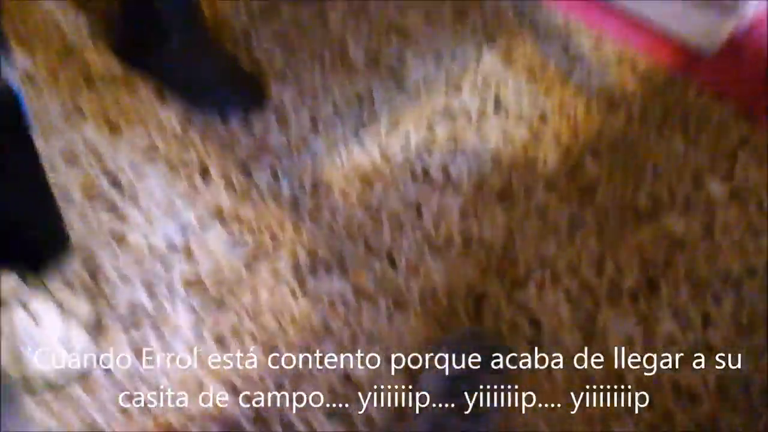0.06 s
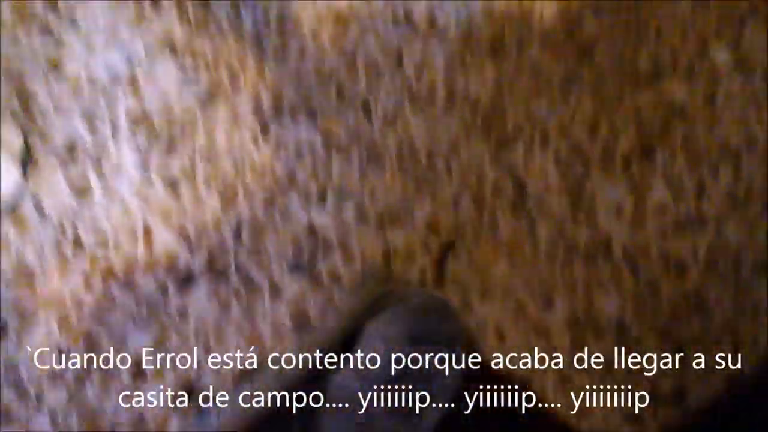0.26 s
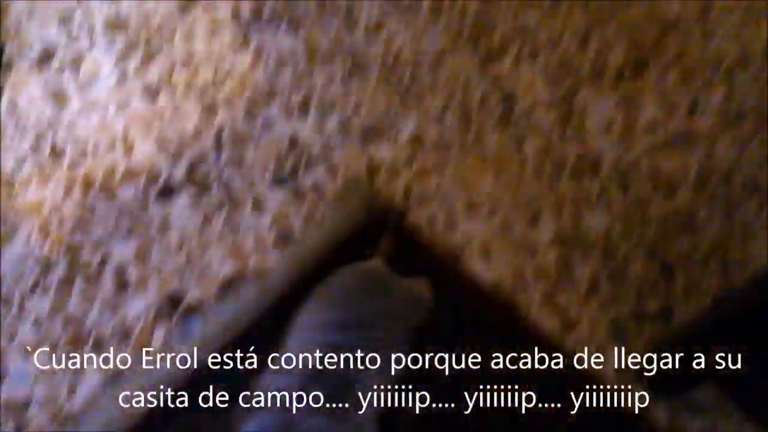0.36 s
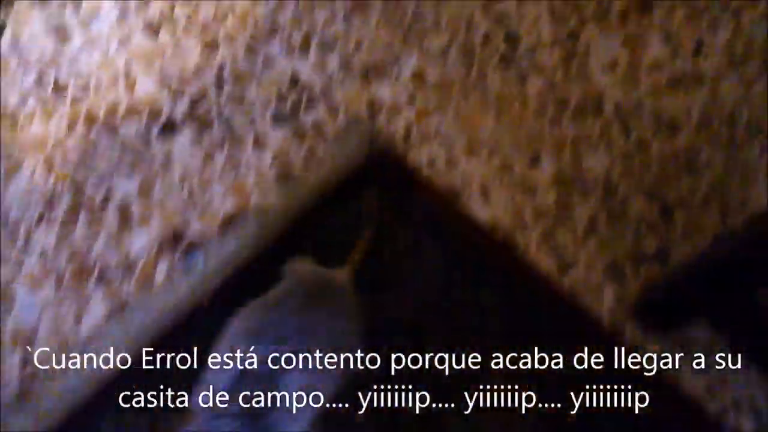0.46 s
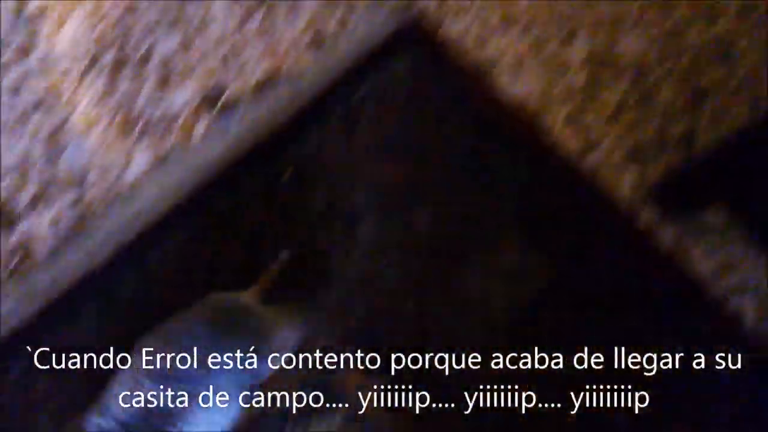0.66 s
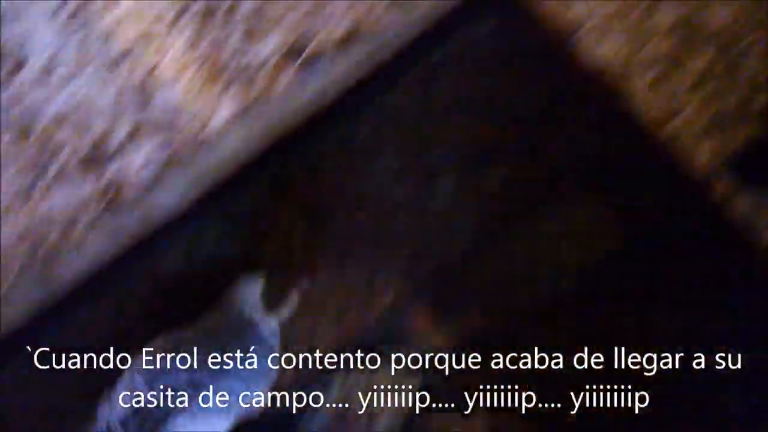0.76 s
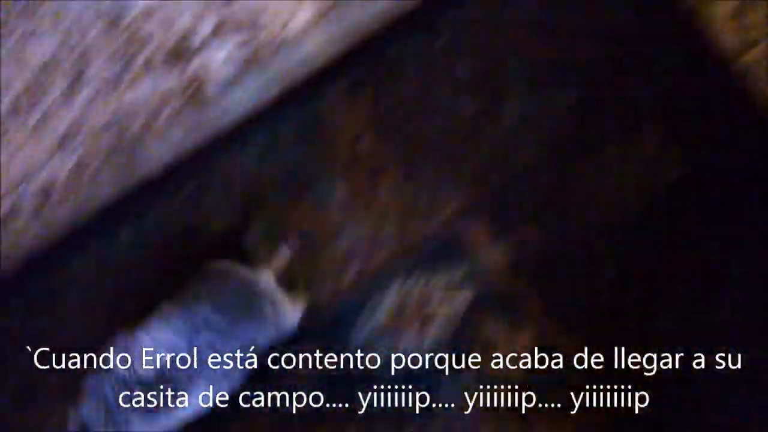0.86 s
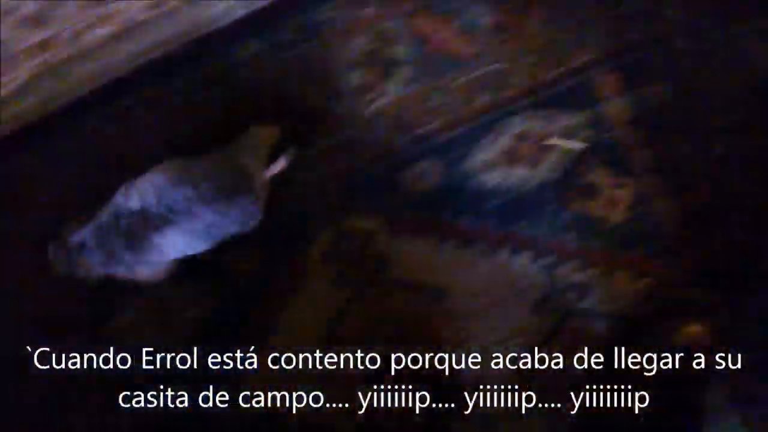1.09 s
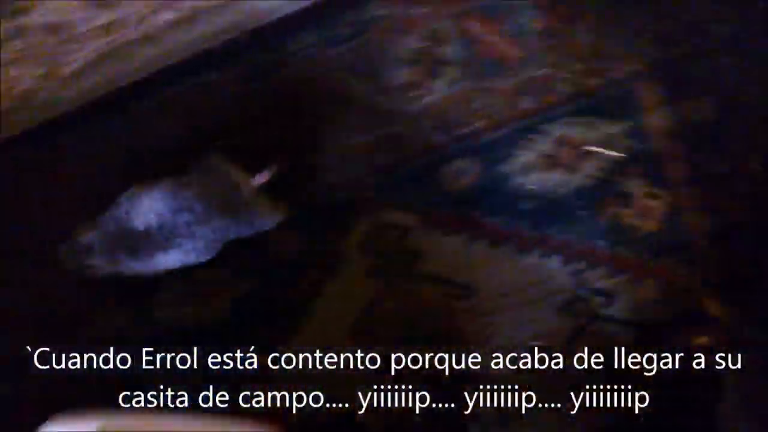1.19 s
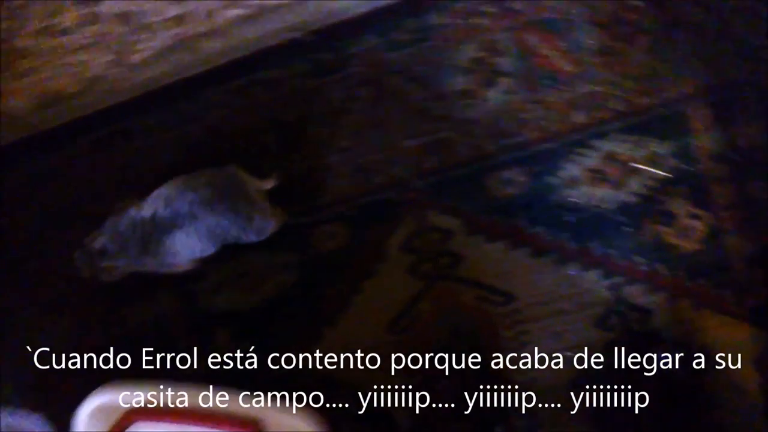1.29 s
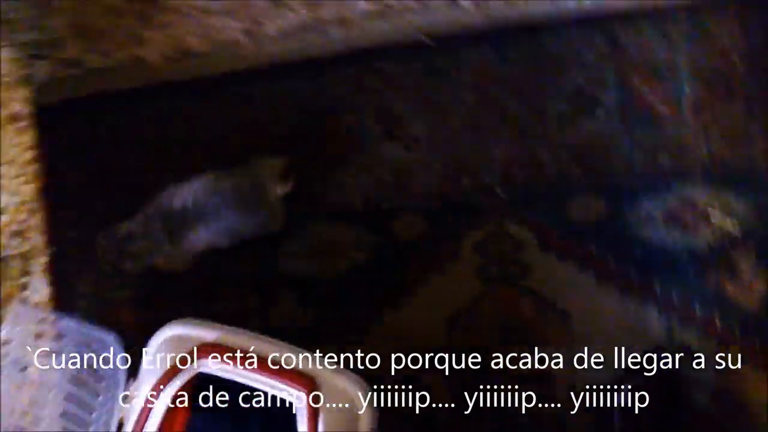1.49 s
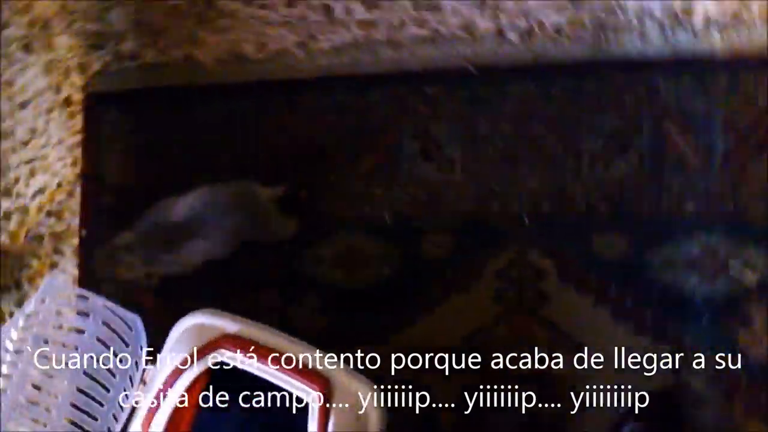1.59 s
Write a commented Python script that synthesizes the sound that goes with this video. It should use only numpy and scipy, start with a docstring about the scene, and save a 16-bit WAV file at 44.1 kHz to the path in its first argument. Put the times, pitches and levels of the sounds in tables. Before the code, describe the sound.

A prairie dog gives one harsh, piercing yip in a small carpeted room, from 0.2 to 0.92 seconds, its pitch dipping, wavering and rising again, mixed with hiss and ending in a raspy puff. A soft footfall hides beneath it at 0.33. Quiet hum and handheld rumble continue; cloth rustles at the start and around 1.3, a step lands at 1.53, a tiny tick at 1.6.

```python
"""Faint hum, room noise, the rumble of a hand-held microphone and rustling cloth (shaped noise) come first.
At 0.2 s a prairie dog gives one long, harsh, wavering yip on the carpet of a small room: a stack of
overtones mixed with hiss. A soft footfall, made of dying sine waves, lies under it at 0.33 s.
The yip ends near 0.92 s in a short raspy puff of noise, and the room rings briefly.
Then a faint low ring swells, cloth rustles again, a foot lands at 1.53 s and something ticks at 1.61 s."""
import sys
import numpy as np
from scipy import signal
from scipy.fft import rfft, irfft
from scipy.io import wavfile
from scipy.ndimage import map_coordinates

SR = 44100
rng = np.random.default_rng(int(sys.argv[2]) if len(sys.argv) > 2 else 0)


def to_wav(s):
    """Save 16-bit WAV."""
    ch = np.atleast_2d(s).T  # columns
    pcm = np.round(np.clip(ch, -1, 1) * 32767)  # PCM
    wavfile.write(sys.argv[1], SR, pcm.astype(np.int16))


N = 72765
T, HZ = np.arange(N) / SR, np.fft.rfftfreq(N, 1 / SR)
EDGE_HZ = 15600  # top of the sound

# Colour of the room noise: (frequency [Hz], relative level [dB])
AIR_COLOUR = [(15, 7), (30, 4.5), (55, -5), (95, -12.5), (150, -21.5), (300, -22), (600, -23), (1000, -28),
              (2500, -37), (5000, -38.5), (7500, -33.5), (11000, -40), (15500, -53)]
# How alike the room noise is at both ears, before balancing: (frequency [Hz], likeness [0-1])
AIR_LIKENESS = [(30, 0.076), (120, 0.28), (300, 0.73), (1000, 0.19), (4000, 0.033)]
# Balance of the room noise: (frequency [Hz], left over right [dB])
AIR_BALANCE = [(30, -1), (70, 15.5), (200, -5), (600, -5), (8000, 1.5)]
AIR_DB, RUMBLE_HZ = -55, 114  # room noise level before the rumble changes; the rumble lies below this pitch
# Change in the handling rumble: (time [s], level [dB])
RUMBLE_LEVEL = [(0, -3.5), (.17, 1.5), (.35, 0.5), (1.0, 1), (1.2, -3), (1.3, -9.5), (1.65, -8)]
# Steady hums: (frequency [Hz], width [Hz], level [dB])
HUMS = [(303.3, 3.7, -76.5), (528, 30, -81.5)]
# Faint low ring, strongest after the call: (time [s], level [dB])
RING_LEVEL = [(.15, -107), (.24, -65), (.4, -80), (.98, -75.5), (1.1, -62), (1.27, -73), (1.36, -79)]
RING_HZ, RING_WIDTH_HZ = 552, 40

# Strokes of cloth: (start [s], attack [s], hold [s], time to fall 60 dB [s], level [dB])
RUSTLES = [(0, 0.005, 0.0073, 0.17, -68), (0.063, 0.078, 0.019, 0.092, -79),
           (1.08, 0.067, 0.015, 0.21, -76), (1.279, 0.087, 0.082, 0.1, -65.5), (1.628, 0.025, .02, .1, -69)]
# Colour of the cloth noise: (frequency [Hz], relative level [dB])
CLOTH_COLOUR = [(200, -13), (600, -12), (1700, -1), (2800, 1), (4500, -4.5), (8000, -11.5), (11000, -17),
                (15500, -31)]

# Pitch of the voice before its random wavering: (time [s], pitch [Hz])
PITCH = [(.196, 2417), (.211, 2500), (.238, 2410), (.252, 2300), (.266, 2380), (.28, 2290), (.29, 2470),
         (.301, 2830), (.32, 2750), (.34, 2447), (.358, 1900), (.392, 1443), (.44, 1990), (.458, 1985),
         (.472, 2045), (.495, 1946), (.51, 2060), (.528, 1835), (.552, 1820), (.568, 1985), (.58, 1814),
         (.592, 1805), (.606, 1577), (.634, 1975), (.65, 1950), (.672, 1540), (.697, 1989), (.718, 2100),
         (.742, 2020), (.758, 2470), (.784, 2650), (.822, 2440), (.868, 2385), (.9, 2200), (.93, 2170)]
# Effort of the call: (time [s], level [dB])
EFFORT = [(.194, -53), (.198, -39.5), (.214, -37), (.24, -33), (.272, -38), (.3, -32), (.325, -37),
          (.345, -44), (.38, -44), (.44, -38.5), (.49, -38), (.55, -32.5), (.59, -38.5), (.612, -39.5),
          (.635, -41.5), (.668, -44), (.705, -40.5), (.738, -37), (.765, -36), (.85, -35.5), (.866, -40),
          (.915, -34), (.93, -59), (.94, -77)]
# State of the throat: (time [s], roughness [0-1], strength of the half-pitch lines [0-1])
THROAT_STATE = [(.2, 0.2, 0), (.236, 0.22, 0), (.256, 1.03, 0.18), (.3, 0.71, 0.04), (.35, 0.92, 0.26),
                (.41, .5, 0.05), (.45, 0.2, 0.4), (.485, 0.07, 0.42), (.508, 1, 0.23), (.532, 0.1, .03),
                (.562, 0.33, 0.03), (.6, 0.65, 0), (.635, 0.4, 0), (.665, 0.47, 0), (.7, 0.48, 0.28),
                (.74, 0.77, 0.76), (.775, 0.04, 0.14), (.798, 0.25, 0.36), (.815, .55, 0.48),
                (.85, .2, 0.36), (.88, 0.63, 0.13), (.92, 0.7, 0.3)]
# Shape of the mouth: (time [s], extra level of the fundamental [dB], treble slope above PIVOT_HZ [dB/octave])
MOUTH_SHAPE = [(.2, -6, 6.5), (.3, -0.5, 11.5), (.4, 0.5, 7.5), (.47, 0.5, 5.5), (.54, 0.5, -9),
               (.66, 0.5, 6), (.735, -5, -12.5), (.78, 1, -10.5), (.85, 2, -14.5), (.92, 8, -4.5)]
# Throat and mouth response for the tone: (frequency [Hz], level [dB])
TONE_RESPONSE = [(700, -45), (1300, -24.5), (1900, -12.5), (2500, -6), (3000, -18), (3700, -4), (5000, -9),
                 (6200, -5), (7400, 0.5), (8600, 0), (9900, -4.5), (11500, -9.5), (15500, -23.5)]
# Throat and mouth response for the hiss: (frequency [Hz], relative level [dB])
HISS_RESPONSE = [(300, -36), (1300, -42), (2200, -13), (2900, -19.5), (3700, -12.5), (4700, -4.5),
                 (6000, -7), (7600, 0.5), (9900, 0.5), (12000, -7.5), (15500, -21)]
PIVOT_HZ = 7160  # main resonance
WAVER, WAVER_HZ = 0.00367, 94  # constant wobble: share of the pitch, bandwidth
JITTER, JITTER_HZ = 0.0313, 448  # wobble at full roughness: share of the pitch, bandwidth
SHIMMER, FLUTTER_HZ = 0.52, 297.1  # flutter of each overtone at full roughness: depth, new values per second
HISS_SHARE, HISS_GROWTH = 0.82, 1.18  # share at full roughness; hiss grows faster than roughness

# Soft footfalls: (time [s], level [dB])
STEPS = [(.33, -61.5), (1.53, -55)]
# What the floor rings with: (frequency [Hz], relative level [dB], time to fall 60 dB [s])
FLOOR_MODES = [(200, -9.5, 0.1), (296, -2.5, 0.029), (649, -9, 0.12), (848, -12, 0.12), (935, -5, 0.059),
               (1231, -11, 0.091), (2060, -25, .1)]

# Rasp that leads into the puff: (time [s], level [dB])
RASP_LEVEL = [(.72, -90), (.755, -55), (.785, -67), (.835, -51.5), (.865, -69), (.912, -43), (.94, -98)]
# Colour of the rasp and the puff: (frequency [Hz], relative level [dB])
PUFF_COLOUR = [(120, -54), (280, -10), (500, -10), (1000, -1.5), (1450, -3.5), (2200, 4), (3100, -2),
               (6000, -6.5), (9000, -3.5), (12000, -39), (15500, -23)]
PUFF_S, PUFF_ATTACK_S, PUFF_HOLD_S, PUFF_T60_S, PUFF_DB = .917, .006, .005, .04, -33.5

TICK_S, TICK_HZ, TICK_WIDTH_HZ, TICK_LENGTH_S, TICK_DB = 1.606, 4340, 820, 0.0015, -62

# How long the room rings: (frequency [Hz], time to fall 60 dB [s])
ROOM_T60 = [(250, 0.39), (1000, 0.32), (2300, 0.31), (6000, .27), (10000, 0.21), (15000, 0.23)]
ROOM_DB, ROOM_GAP_S = -3, 0.0059  # tail against the direct sound, silence before the tail
EARLY_DB, EARLY_S = -0.5, .012  # near reflections all together, latest arrival
# Direction of the animal: (frequency [Hz], left over right [dB])
ANIMAL_BALANCE = [(500, -1.5), (2000, -3), (4000, -2.5), (6000, -1.5), (7400, -9.5), (8500, 7), (10000, 8),
                  (14000, 1.5)]
# The animal runs across: (time [s], lag of the left ear [ms], extra left over right [dB])
BEARING = [(.2, -0.053, 2.5), (.5, 0.0023, -0.5), (.8, 0.393, -1.5), (.93, 0.386, -2)]


def amp(db):
    """Turns decibels into a gain."""
    return 10 ** (np.asarray(db) / 20)


def unit(x):
    """Scales a sound to an average (rms) strength of 1."""
    return x / np.sqrt(np.mean(x ** 2) + 1e-20)


def curve(rows):
    """Draws each column of a time table as a value for every sample."""
    times, *columns = np.transpose(rows)
    return [np.interp(T, times, column) for column in columns]


def read(points, hz):
    """Reads a frequency table, with straight lines on a log-frequency axis."""
    table_hz, value = np.transpose(points)
    return np.interp(np.log(hz + 1), np.log(table_hz + 1), value)


def colour(x, gain):
    """Filters a sound by a gain for each frequency."""
    return irfft(rfft(x) * gain, N)


def noise(gain):
    """Makes noise of rms 1 with the given spectrum."""
    return unit(colour(rng.standard_normal(N), gain))


def band(hz, width_hz):
    """Makes noise of rms 1 around one frequency, in a bell-shaped band."""
    return noise(np.exp(-.5 * ((HZ - hz) / width_hz) ** 2))


def wander(rate_hz):
    """Draws a random curve of rms 1 that takes new values at the given rate."""
    values = rng.standard_normal(size=2000)
    return unit(np.interp(T * rate_hz, np.arange(len(values)), values))


def swell(start, attack, hold, t60, db):
    """Shapes a level that rises, holds and dies away."""
    rise = np.clip((T - start) / attack, 0, 1)
    release_age = np.maximum(T - start - attack - hold, 0)
    return rise * amp(db) * .001 ** (release_age / t60)


def place(x, sides):
    """Sets the left-right balance by frequency, keeping the power of both ears together."""
    gains = amp(np.outer([.5, -.5], read(sides, HZ)))
    return colour(x, gains / np.sqrt((gains ** 2).mean(0)))


def background():
    """Room noise with its lows rising and falling as handling rumble, plus narrow noise as hum and low ring."""
    a, b = (noise(amp(read(AIR_COLOUR, HZ))) for _ in range(2))
    same = read(AIR_LIKENESS, HZ)
    # the second ear shares part of the first ear's noise
    other = colour(a, same) + colour(b, np.sqrt(1 - same ** 2))
    air = amp(AIR_DB) * place(np.array([a, other]), AIR_BALANCE)
    low = colour(air, 1 / (1 + (HZ / RUMBLE_HZ) ** 4))
    rumble = low * amp(curve(RUMBLE_LEVEL)[0])
    hum = sum(amp(db) * band(hz, width) for hz, width, db in HUMS)
    ring = amp(curve(RING_LEVEL)[0]) * band(RING_HZ, RING_WIDTH_HZ)
    return air - low + rumble + hum + ring


def rustles(grain_db=1.5, grain_hz=150):
    """Cloth slides in soft strokes of noise whose strength varies at random, like grain."""
    grain = amp(grain_db * band(0, grain_hz))
    strokes = sum(swell(*row) for row in RUSTLES)
    return strokes * unit(noise(amp(read(CLOTH_COLOUR, HZ))) * grain)


def yip():
    """Unsteady vocal folds, with half-pitch lines and pulsed hiss, sound through the throat and mouth."""
    (hz,), (effort_db,) = curve(PITCH), curve(EFFORT)
    base_db, slope_db = curve(MOUTH_SHAPE)
    rough, half = np.clip(curve(THROAT_STATE), 0, 1)
    wobble = WAVER * band(0, WAVER_HZ) + JITTER * rough * band(0, JITTER_HZ)
    phase = 2 * np.pi * np.cumsum(hz * (1 + wobble)) / SR
    flutter = SHIMMER * np.sqrt(rough)
    tone, power = np.zeros(N), np.zeros(N)
    for k in np.arange(2, 21) / 2:  # multiples of the pitch: 1, 1.5, 2 ... 10
        line_hz = k * hz
        slope = slope_db * np.maximum(np.log2(line_hz / PIVOT_HZ), 0)
        gain = amp(read(TONE_RESPONSE, line_hz) + base_db * (k == 1) + slope)
        gain = gain * (line_hz < EDGE_HZ) * (half if k % 1 else 1)
        turn = k * phase + 2 * np.pi * rng.random()
        # random sine and cosine parts shake both strength and phase
        steady_part = np.cos(turn) * (1 + flutter * wander(FLUTTER_HZ))
        tone += gain * (steady_part + np.sin(turn) * flutter * wander(FLUTTER_HZ))
        power += gain ** 2 * (.5 + flutter ** 2)
    # the hiss pulses once in each cycle of the voice
    hiss = unit(noise(amp(read(HISS_RESPONSE, HZ))) * (1 + 0.32 * np.cos(phase)))
    share = np.clip(HISS_SHARE * rough ** HISS_GROWTH, 0, 1)
    voice = np.sqrt((1 - share ** 2) / power) * tone + share * hiss
    calling = (T > EFFORT[0][0]) * (T < EFFORT[-1][0])
    return amp(effort_db) * calling * voice


def steps():
    """Each footfall rings the floor under the carpet as a few dying sine waves."""
    out = np.zeros(N)
    for start, db in STEPS:
        age = np.maximum(T - start, 0)
        for hz, mode_db, t60 in FLOOR_MODES:
            out += amp(db + mode_db - 60 * age / t60) * np.sin(2 * np.pi * hz * age)
    return out


def puff():
    """The call turns raspy and collapses into a wide burst of noise."""
    rasping = (T > RASP_LEVEL[0][0]) * (T < RASP_LEVEL[-1][0])
    rasp = amp(curve(RASP_LEVEL)[0]) * rasping
    burst = swell(PUFF_S, PUFF_ATTACK_S, PUFF_HOLD_S, PUFF_T60_S, PUFF_DB)
    return (rasp + burst) * noise(amp(read(PUFF_COLOUR, HZ)))


def tick():
    """One tiny, dry, bright tick: a band of noise in a very short bell-shaped pulse."""
    pulse = np.exp(-.5 * ((T - TICK_S) / TICK_LENGTH_S) ** 2)
    return amp(TICK_DB) * band(TICK_HZ, TICK_WIDTH_HZ) * pulse


def room(x):
    """Adds a few near reflections and a short diffuse tail, different at each ear, to the direct sound."""
    hz, t, grid = signal.stft(rng.standard_normal((2, N)), SR, nperseg=256)
    fading = grid * amp(-60 * t / read(ROOM_T60, hz)[:, None])
    tail = signal.istft(fading, SR, nperseg=256)[1][:, :N]
    tail = tail * np.clip(T / ROOM_GAP_S - 1, 0, 1)
    response = amp(ROOM_DB) * tail / np.linalg.norm(tail[0])
    response[:, 0] += 1  # direct sound
    for ear in response:
        delays = rng.uniform(.1, 1, size=6) * EARLY_S
        signs = rng.choice([-1, 1], len(delays))
        ear[(delays * SR).astype(int)] += amp(EARLY_DB) * signs / np.sqrt(len(delays))
    return signal.fftconvolve(x[None], response, axes=1)[:, :N]


def moving(pair):
    """Delay and balance between the ears follow the animal as it runs."""
    lag_ms, side_db = curve(BEARING)
    left = map_coordinates(pair[0], [np.arange(N) - lag_ms * SR / 1000], order=5)
    return np.array([left * amp(side_db / 2), pair[1] / amp(side_db / 2)])


def scene():
    """Puts the animal and the small noises together in the room."""
    animal = moving(place(room(yip() + puff()), ANIMAL_BALANCE))
    return background() + room(rustles() + steps()) + animal + tick()


def record(dry):
    """The recorder cuts off everything above its top frequency."""
    low_pass = signal.firwin(511, EDGE_HZ, window=("kaiser", 9), fs=SR)
    return signal.oaconvolve(dry, low_pass[None], "same")


dry = scene()
out = record(dry)
to_wav(out)
```